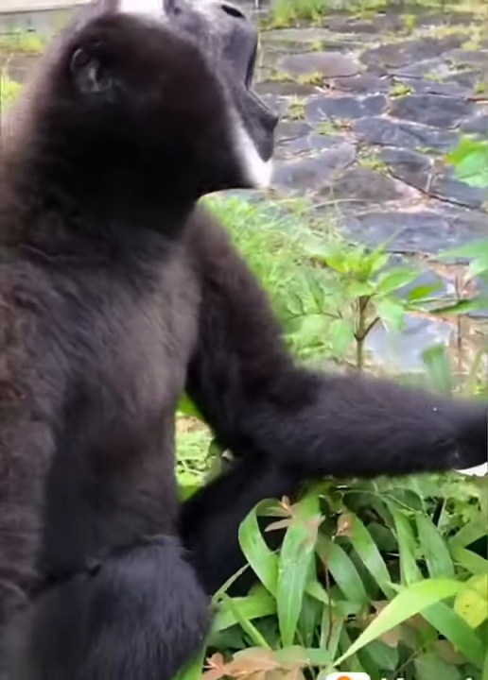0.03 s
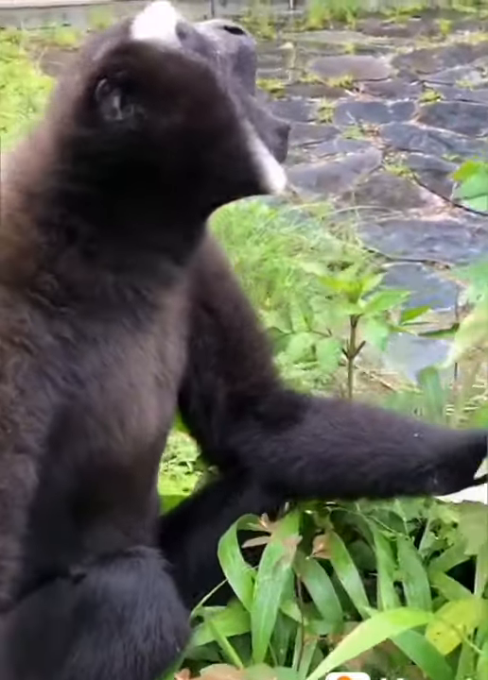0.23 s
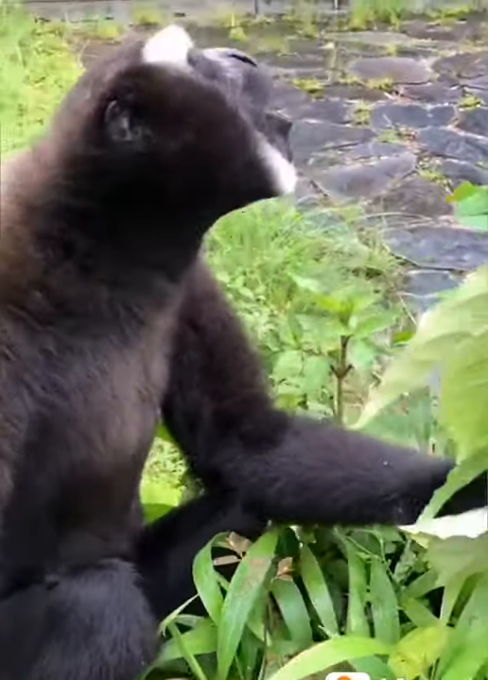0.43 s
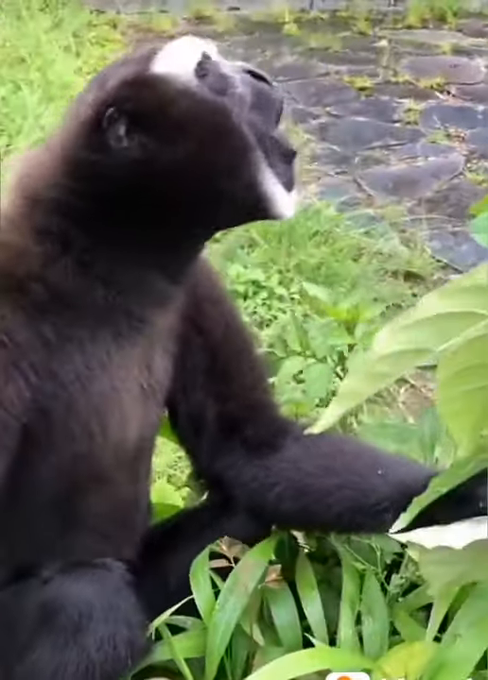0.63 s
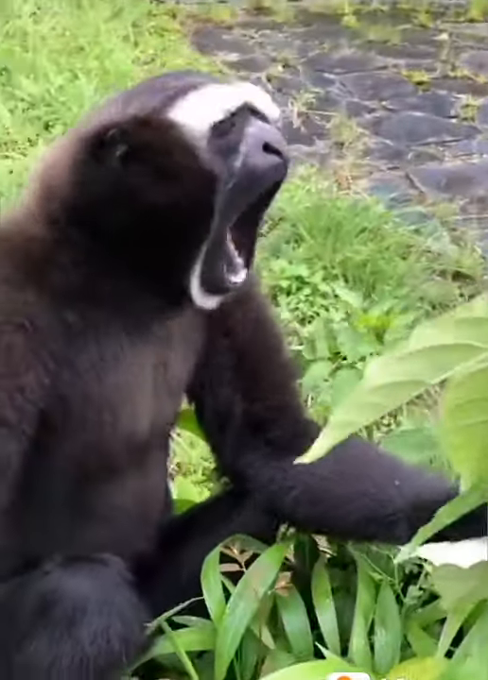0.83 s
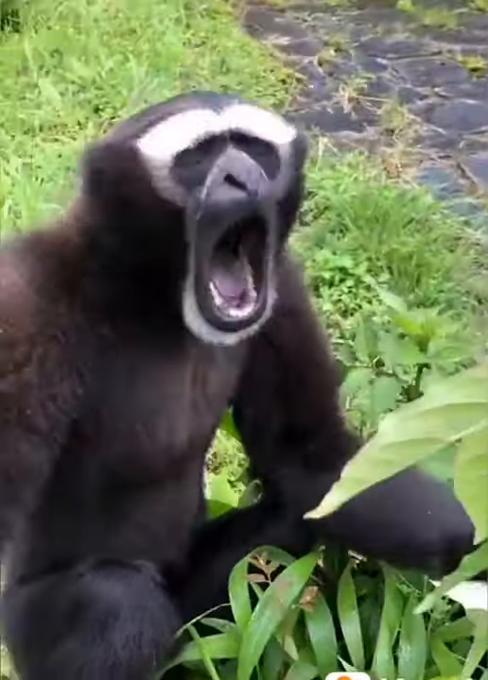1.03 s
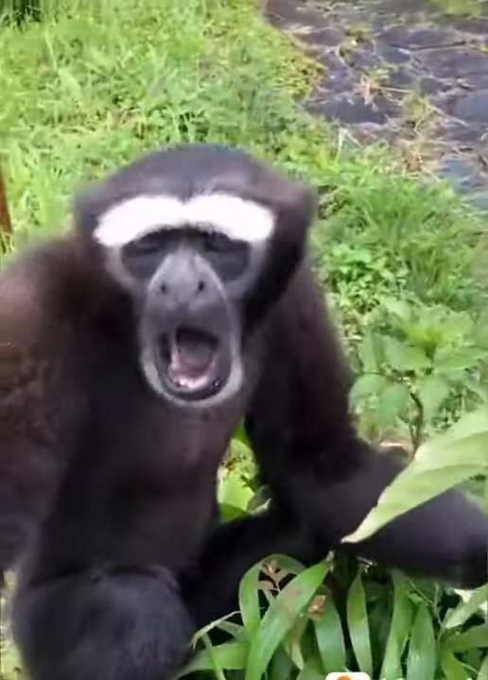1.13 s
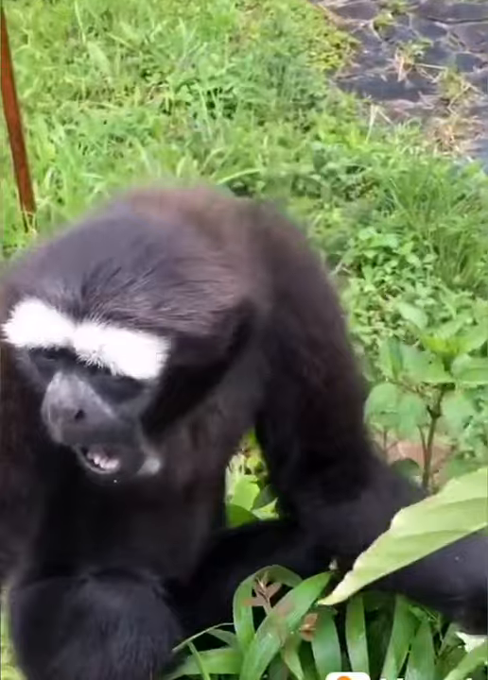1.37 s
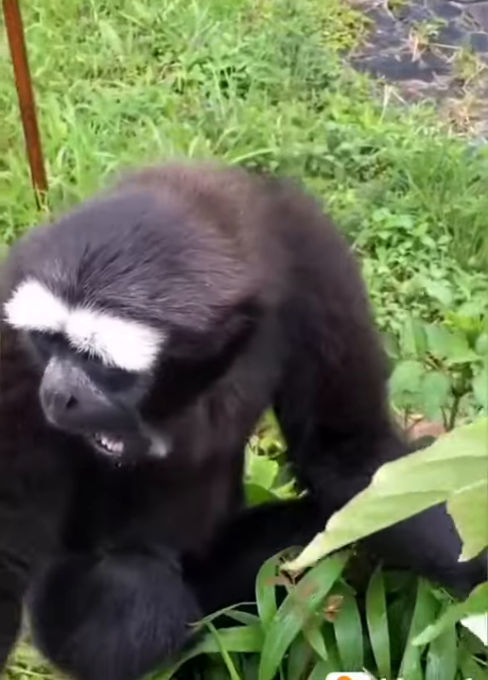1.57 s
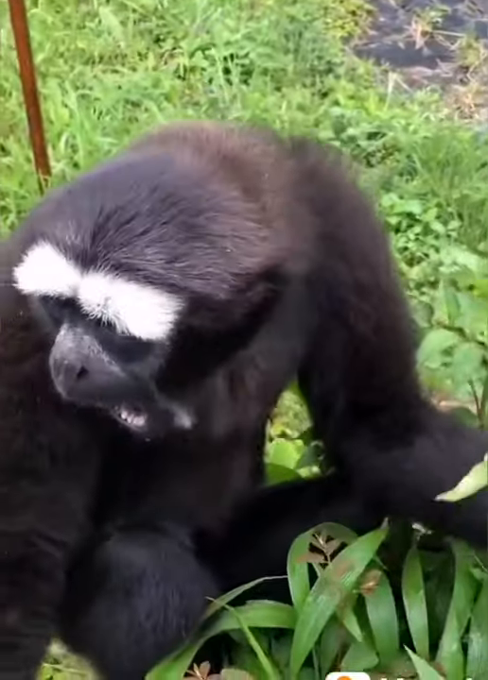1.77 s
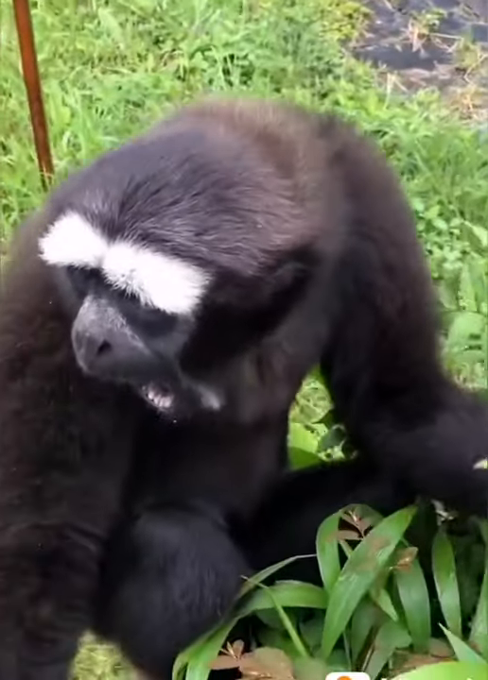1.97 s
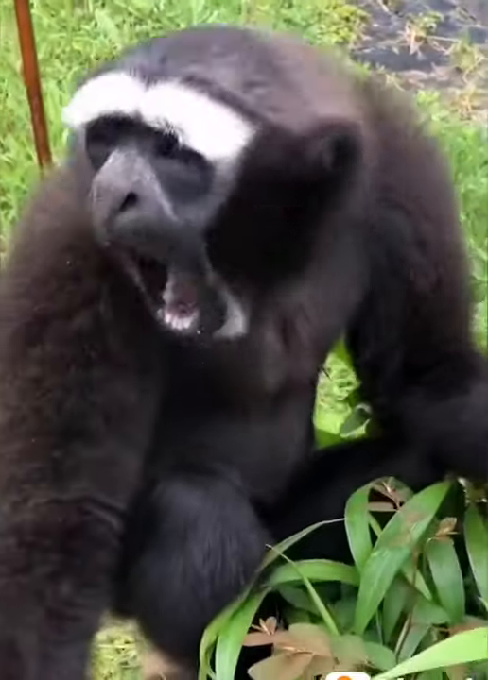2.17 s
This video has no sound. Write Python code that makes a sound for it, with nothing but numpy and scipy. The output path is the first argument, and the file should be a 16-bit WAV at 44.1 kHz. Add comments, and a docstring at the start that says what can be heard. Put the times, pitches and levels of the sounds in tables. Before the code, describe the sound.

A gibbon hoots loudly close by, one sliding down, then whoops rising in a quiet garden

```python
"""A gibbon calls close by in a garden, over very quiet outdoor noise and a thin insect shrill.
First comes the end of one hoot, then a held hoot that slides down, with a faint steady whistle over it.
A rising whoop follows, then a soft low thump, a pause, and a last rising whoop with a harsh attack.
Each hoot is a gliding sine tone with overtones shaped by the throat; filtered noise adds rasp and hiss.
Decaying noise gives the voice a short scatter and a long, faint echo."""
import sys
import numpy as np
from scipy import signal
from scipy.fft import rfft, irfft
from scipy.io import wavfile
from scipy.ndimage import uniform_filter1d, minimum_filter1d

SR = 44100
rng = np.random.default_rng(int(sys.argv[2]) if len(sys.argv) > 2 else 0)


def master(y):
    """Save y as 16-bit WAV."""
    cut = np.clip(np.atleast_2d(y).T, -1, 1)
    pcm = np.round(cut * 32767)  # scale
    wavfile.write(sys.argv[1], SR, pcm.astype(np.int16))


N = 97020
TIME = np.arange(N) / SR   # seconds
CUTOFF_HZ = 15700   # top of the sound

# loudness of the voice, one table per hoot: start_s, fundamental_db, octave_db, higher_overtones_db
HOOT_LEVELS = [
    [(0.0, -7.5, -29, -24.5), (0.028, -7, -32.5, -32.5), (0.052, -11.5, -21.5, -36.5),
     (0.064, -17, -28.5, -43), (0.074, -45, -67.5, -47.5)],
    [(0.078, -35.3, -37, -30), (0.087, -15.4, -28, -10.5), (0.098, -5.5, -20, -5.5),
     (0.125, -7.1, -23.0, -9.5), (0.2, -6.5, -27.0, -11), (0.31, -6, -28.0, -7.5),
     (0.352, -6.1, -25.0, -14.5), (0.385, -19, -16.0, -14), (0.41, -12.0, -17.5, -32),
     (0.445, -9.5, -27, -32), (0.465, -12.5, -36.0, -35), (0.5, -20.5, -30.0, -35.0),
     (0.55, -33, -45.5, -45), (0.568, -50, -54.5, -49.5)],
    [(0.58, -31.5, -47.5, -62.5), (0.59, -14.5, -51.5, -44.5), (0.615, -9.5, -17.5, -35.0),
     (0.642, -18, -31.5, -39), (0.672, -5.5, -38, -25.5), (0.7, -5.5, -52.0, -26.5),
     (0.73, -5.5, -38.0, -24), (0.768, -13.5, -36, -17), (0.81, -6, -35, -14.5), (0.86, -6.5, -49.5, -14.5),
     (0.93, -6.5, -26.0, -11.5), (0.975, -9, -22.5, -12), (1.0, -12, -26.5, -16.5), (1.02, -37.5, -68, -61)],
    [(2.028, -36, -49, -50.5), (2.033, -11.5, -20, -23), (2.048, -7.5, -18.5, -17.5),
     (2.064, -11, -16.5, -20), (2.09, -7, -15.5, -19.0), (2.14, -6.5, -20.0, -21), (2.2, -7, -26.5, -20)],
]
# hard attack of the last whoop: start_s, level_db
HARD_ATTACKS = [(2.033, -31)]


def from_db(db):
    """Turn decibels into a gain."""
    return 10 ** (np.asarray(db) / 20)


def rms_one(x):
    """Scale a sound to an average (rms) level of 1."""
    return x / np.sqrt(np.mean(x ** 2) + 1e-20)


def in_time(rows):
    """Draw straight lines between the rows, giving each column a value at every sample."""
    seconds, *columns = np.transpose(rows)
    return [np.interp(TIME, seconds, column) for column in columns]


def at_hz(points, hz, axis=1):
    """Read one column of a spectrum table, with pitch spaced as the ear hears it (log scale)."""
    points = np.array(points)
    return np.interp(np.log(np.maximum(hz, 1)), np.log(points[:, 0]), points[:, axis])


def waver(hz):
    """Random motion no faster than about the given rate, with a spread of 1."""
    smoother = signal.butter(4, hz, fs=SR, output="sos")
    motion = signal.sosfilt(smoother, rng.standard_normal(N + SR))
    return rms_one(motion[SR:])   # drop the first second, where the filter settles


def coloured_noise(spectrum):
    """Noise whose frequencies are weighted by a spectrum table, at rms 1."""
    hz = np.arange(N // 2 + 1) * SR / N
    white = rfft(rng.standard_normal(N))
    return rms_one(irfft(white * from_db(at_hz(spectrum, hz)), N))


def gate(start, end, edge):
    """Fully open from start to end, with a short smooth ramp outside each (all in seconds)."""
    inside = np.minimum(TIME - start, end - TIME)
    opening = np.clip(1 + inside / edge, 0, 1)
    return np.sin(np.pi / 2 * opening) ** 2


def background():
    """Quiet outdoor air as coloured noise, and distant insects as a narrow band of noise."""
    # colour of the outdoor air: pitch_hz, level_db_per_hz (relative)
    air_colour = [(15, -38.5), (25, -19.5), (93, -4.5), (488, -25.5), (604, -31), (811, -29.5), (903, -5),
                  (978, -35), (1460, -14), (3350, -29.5), (4040, -21), (5140, -28.5), (6200, -16),
                  (7280, -39), (15000, -47.5)]
    air_db, insect_db = -70.5, -83
    insect_hz, insect_width_hz = 5900, 170
    # a slow random strength spreads the steady tone into a narrow band
    insects = rms_one(waver(insect_width_hz) * np.sin(2 * np.pi * insect_hz * TIME))
    return from_db(air_db) * coloured_noise(air_colour) + from_db(insect_db) * insects


def garden_echo(x):
    """Quick scatter from ground and plants, and a faint echo that lasts longest near 1.2 kHz."""
    # echo of the surroundings: pitch_hz, level_db, t60_s (time to fade by 60 dB)
    echo = [(300, -32.5, 0.5), (602, -28.5, 0.33), (991, -38.5, 1.15), (1250, -31, 1.276), (2500, -33, .95),
            (5030, -35, 0.64), (7500, -35.5, .5), (14000, -43.5, .3)]
    near_db, near_t60_s = -28.5, 0.16
    near_decay = from_db(near_db - 60 * TIME / near_t60_s)
    unit_energy = np.sqrt(np.log(1e6) / (near_t60_s * SR))
    response = near_decay * rng.standard_normal(N) * unit_energy
    edges_hz = np.geomspace(220, 15000, 19)
    for low, high in zip(edges_hz, edges_hz[1:]):
        hz = np.sqrt(low * high)   # middle of the band
        decay = from_db(-60 * TIME / at_hz(echo, hz, axis=2))
        band_filter = signal.butter(2, [low, high], "band", fs=SR, output="sos")
        band = signal.sosfilt(band_filter, rng.standard_normal(N))
        response += from_db(at_hz(echo, hz)) * band * decay / np.sqrt(np.sum(decay ** 2))
    return signal.fftconvolve(x, response)[:N]


def thump():
    """A soft, low sine blip that falls in pitch."""
    start_s, length_s, peak_db = 1.055, .045, -56.5
    from_hz, to_hz = 380, 55
    progress = np.clip((TIME - start_s) / length_s, 0, 1)
    hz = from_hz * (to_hz / from_hz) ** progress
    swell = np.sin(np.pi * progress)
    return from_db(peak_db) * swell * np.sin(2 * np.pi * np.cumsum(hz) / SR)


def whistle():
    """A faint high sine tone that keeps its pitch while the voice slides."""
    # loudness of the whistle: start_s, level_db
    whistle_level = [(.1, -92.5), (.14, -48), (.3, -52.5), (.42, -77), (.56, -67)]
    pitch_hz = 8110
    opening = gate(whistle_level[0][0], whistle_level[-1][0], .01)
    tone = np.sqrt(2) * np.sin(2 * np.pi * pitch_hz * TIME)   # rms 1
    return from_db(in_time(whistle_level)[0]) * opening * tone


def attack():
    """A bright, harsh burst of fading noise as the voice snaps on."""
    # colour of the burst: pitch_hz, level_db_per_hz (relative)
    attack_colour = [(40, -17), (300, -13.5), (1100, -10.5), (4200, 5.5), (7500, 2.5), (10000, -9.5),
                     (12500, -29.5), (15000, -26)]
    rise_s, t60_s = .003, .22
    envelope = np.zeros(N)
    for start_s, level_db in HARD_ATTACKS:
        fade = np.exp(-np.log(1000) * np.abs(TIME - start_s) / t60_s)
        envelope += gate(start_s, N / SR, rise_s) * from_db(level_db) * fade
    return envelope * coloured_noise(attack_colour)


def rasp():
    """Turbulent air in the throat during the calls: noise whose narrow bands each flutter alone."""
    # loudness of the rasp: start_s, level_db
    rasp_level = [(0, -59.5), (.065, -55), (.09, -33.5), (.13, -51), (.18, -62), (.3, -61.5), (.37, -45.5),
                  (.43, -44.5), (.53, -51), (.575, -65), (.62, -40), (.68, -40), (.75, -55), (.82, -63.5),
                  (.94, -70), (.99, -46), (1.02, -58.5), (2.034, -57), (2.07, -37.5), (2.11, -53),
                  (2.15, -57), (2.2, -62)]
    # colour of the rasp: pitch_hz, level_db_per_hz (relative)
    rasp_colour = [(40, -14), (200, -29.5), (450, -29), (800, -10), (1250, 0.5), (2000, -5.5), (3100, -4),
                   (4300, -7), (5400, -12.5), (6400, -1), (7600, -5), (8400, -11.5), (9500, -17.5),
                   (12500, -25.5), (15000, -48)]
    edge_s, band_width_hz = .004, 700
    flutter_db, flutter_hz = 3.0, 35
    calling = gate(0, HOOT_LEVELS[2][-1][0], edge_s)   # the first three hoots
    calling += gate(HARD_ATTACKS[0][0], HOOT_LEVELS[3][-1][0], edge_s)   # the last whoop
    spectrum = rfft(coloured_noise(rasp_colour))
    band_number = np.arange(len(spectrum)) * SR / N // band_width_hz
    fluttering = np.zeros(N)
    for k in range(CUTOFF_HZ // band_width_hz):
        band = irfft(spectrum * (band_number == k), N)
        fluttering += band * from_db(flutter_db * waver(flutter_hz))
    return calling * from_db(in_time(rasp_level)[0]) * rms_one(fluttering)


def hoot(pitch, levels, throat):
    """One call: a gliding, jittery tone whose overtones sweep through the throat's resonances."""
    # unsteady vocal folds: start_s, jitter_db (0 = as large as the pitch itself),
    # flicker_db (spread of each overtone's level; its sign makes no audible difference)
    roughness = [(0, -65, -1), (.085, -40, 4.5), (.13, -53.5, 4.5), (.2, -58, -2.5), (.31, -53.5, 3.4),
                 (.38, -54.5, 4), (.55, -35.5, 4.5), (.63, -39, 2.5), (.72, -50, 3), (.82, -57.5, 1.36),
                 (.94, -61, -2.1), (1.0, -59, 7.5), (2.032, -33.5, -4), (2.08, -57, 4.5), (2.16, -54, -2)]
    jitter_hz, flicker_hz = 330, 39.86   # fastest pitch waver and overtone flicker
    shimmer, shimmer_hz = .007, 90   # small random changes of the whole tone's strength
    hz = uniform_filter1d(in_time(pitch)[0], size=500)   # round off the corners of the glide
    jitter_db, flicker_db = in_time(roughness)
    jittery_hz = hz * (1 + from_db(jitter_db) * waver(jitter_hz))
    phase = 2 * np.pi * np.cumsum(jittery_hz) / SR
    first_db, octave_db, overtone_db = in_time(levels)
    tone = from_db(first_db) * np.sin(phase) + from_db(octave_db) * np.sin(2 * phase)
    for k in range(3, 16):
        db = overtone_db + at_hz(throat, k * hz) + flicker_db * waver(flicker_hz)
        tone += from_db(db) * (k * hz < CUTOFF_HZ) * np.sin(k * phase)
    strength = 1 + shimmer * waver(shimmer_hz)
    return np.sqrt(2) * tone * strength * gate(levels[0][0], levels[-1][0], .003)


def scene():
    """Mix the gibbon's voice, whose hoots have no bass, with its echo and the quieter sounds."""
    # glide of the voice, one table per hoot: start_s, pitch_hz
    pitches = [
        [(0, 823), (0.062, 789)],
        [(0.082, 736), (0.098, 843), (0.112, 862), (0.172, 912), (0.31, 916), (0.335, 900), (0.352, 859),
         (0.382, 694), (0.42, 602), (0.47, 508), (0.52, 449), (0.56, 362)],
        [(0.586, 530), (0.602, 532), (0.62, 579), (0.648, 742), (0.675, 830), (0.705, 953), (0.735, 1042),
         (0.77, 1109), (0.85, 1207), (0.9, 1254), (0.955, 1278), (0.98, 1257), (1.012, 1144)],
        [(2.032, 1038), (2.068, 1159), (2.095, 1191), (2.135, 1229), (2.2, 1249)],
    ]
    # throat and mouth resonances that colour the higher overtones, one table per hoot: pitch_hz, level_db
    throats = [
        [(2400, -11.5), (3250, -7.5), (4050, -9), (4900, 0), (5700, -13), (6500, -26.5), (7400, -22.5),
         (8200, -51), (10000, -68.5), (12000, -42)],
        [(1200, 0), (2150, -23), (2700, -22), (3600, -26), (4500, -30.5), (5100, -21), (5600, -37.5),
         (6400, -39), (7300, -42.5), (8200, -55.5), (9200, -59), (11000, -63), (13000, -70.5)],
        [(1600, -8.5), (2300, -6), (3000, -0.5), (3700, -18), (4100, -13.5), (4600, -7), (5600, -30.5),
         (6300, -19), (7300, -18.5), (8200, -50), (8800, -29), (9500, -56.5), (10500, -39.5), (11500, -40),
         (12700, -43), (14000, -81.5)],
        [(3200, -10), (3600, -3.5), (4700, -1), (5500, -9), (6200, -5.5), (7400, -18.5), (8200, -23),
         (8800, -18.5), (10000, -27), (12500, -37), (14000, -60)],
    ]
    hoots = sum(hoot(*call) for call in zip(pitches, HOOT_LEVELS, throats))
    no_bass = signal.butter(4, 250, "high", fs=SR, output="sos")   # cut below 250 Hz
    voice = signal.sosfiltfilt(no_bass, hoots) + rasp() + attack()
    return (voice + garden_echo(voice) + whistle() + thump() + background())[None]


def record(dry):
    """A quick limiter holds the loudest peaks down; the top is cut steeply."""
    ceiling, limiter_s = .95, .008
    size = int(limiter_s * SR)
    needed = np.minimum(1, ceiling / (np.abs(dry) + 1e-9))
    gain = uniform_filter1d(minimum_filter1d(needed, size=size), size=size)
    top_cut = signal.cheby2(12, 70, CUTOFF_HZ, fs=SR, output="sos")
    return signal.sosfilt(top_cut, dry * gain)


dry = scene()
out = record(dry)
master(out)
```